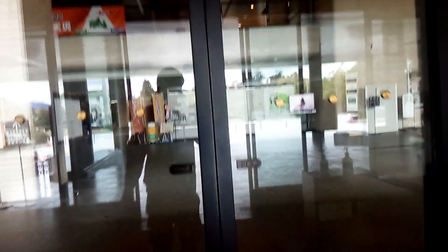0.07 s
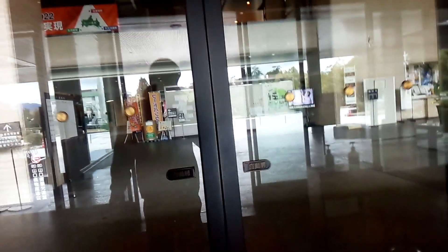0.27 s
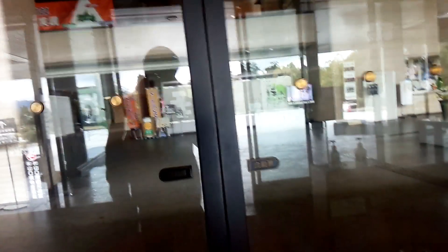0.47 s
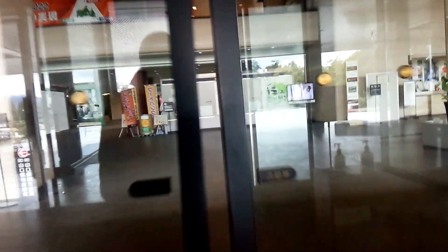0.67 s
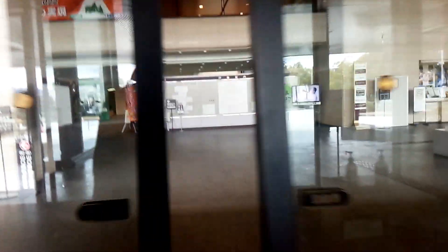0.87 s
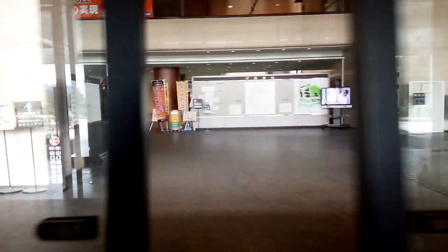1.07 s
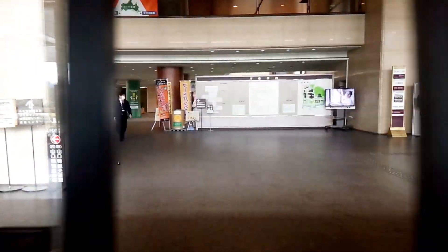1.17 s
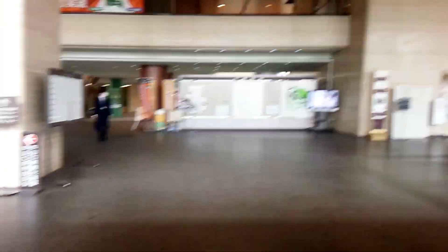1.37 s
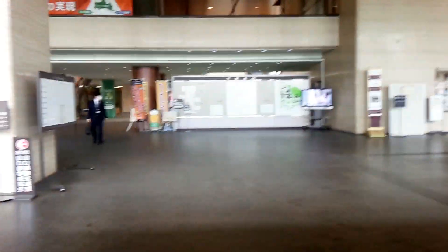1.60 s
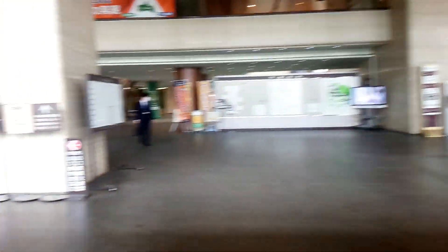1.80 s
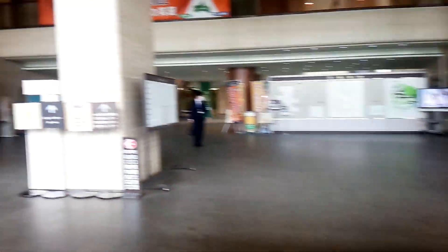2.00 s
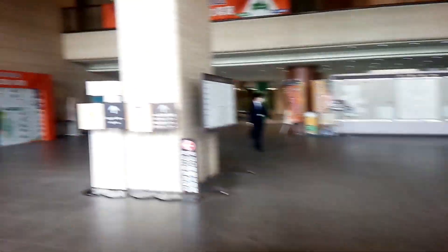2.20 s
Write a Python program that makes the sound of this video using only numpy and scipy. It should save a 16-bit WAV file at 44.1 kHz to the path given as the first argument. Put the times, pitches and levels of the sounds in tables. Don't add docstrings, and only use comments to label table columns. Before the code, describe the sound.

Automatic sliding glass doors start with a brief motor hum and rubbery scrape, then rumble along the rail with light knocks and two hard clicks, heard close up in a hard, echoing entrance porch.

```python
import sys
import numpy as np
from scipy import signal
from scipy.fft import rfft, irfft
from scipy.io import wavfile

SR = 44100
rng = np.random.default_rng(int(sys.argv[2]) if len(sys.argv) > 2 else 0)


def wav_out(sig):
    wavfile.write(sys.argv[1], SR, np.round(np.clip(np.atleast_2d(sig).T, -1, 1) * 32767).astype(np.int16))


def level_to_linear(level):
    exponent = np.asarray(level, float) / 20
    return 10 ** exponent


N = 99225

# (frequency [Hz], density [dB per Hz])
AIR_SPECTRUM = [(150, -15), (250, -18), (600, -16.5), (1200, -28), (2000, -32), (3200, -33.5), (6000, -41),
                (16000, -37.5)]
# (time [s], rotation [Hz], level [dB])
MOTOR_RUN = [
    (.2, 45.87, -76),
    (.25, 44.05, -38.5),
    (.38, 41.73, -40),
    (.46, 42.3, -36),
    (.52, 41.6, -70),
]

# (time [s], level [dB])
SEAL_DRAG = [(.464, -77), (.471, -54), (.49, -44.5), (.56, -47), (.61, -44), (.66, -56), (.75, -62),
             (.9, -64), (1.1, -79)]
BRUSH_DRAG = [(.464, -76), (.48, -54), (.5, -52.5), (.53, -49.5), (.575, -52.5), (.61, -48), (.635, -55.5),
              (.75, -56), (1.0, -70)]
FRAME_HUM = [(0.0, -39), (0.06, -60), (0.38, -35.5), (0.48, -40.5), (0.53, -44), (0.57, -38.5),
             (0.72, -30.5), (.87, -32.5), (.93, -38), (1.05, -37), (1.24, -43.5), (1.38, -37), (1.86, -50),
             (1.88, -42.5), (2.25, -55.5)]
PANE_SHAKE = [(0.0, -38), (0.16, -46.5), (0.21, -39.5), (0.54, -38), (0.64, -30.5), (0.76, -31),
              (0.83, -32), (0.89, -31.5), (0.92, -38), (1.0, -35), (1.25, -45.5), (1.3, -33.5), (1.45, -39),
              (1.56, -40.5), (1.76, -46.5), (1.83, -39.5), (2.04, -53), (2.25, -49)]
BOX_ROLL = [(0.0, -50), (0.03, -58.5), (0.48, -48.5), (0.65, -34), (0.68, -29.5), (.9, -36.5), (.97, -40),
            (1.11, -42), (1.16, -36.5), (1.21, -62), (1.27, -33.5), (1.41, -38), (1.49, -35), (1.9, -40),
            (2.08, -50.5), (2.12, -39.5), (2.21, -47), (2.25, -60)]
RAIL_RUN = [(0.0, -52), (0.43, -61), (0.55, -43), (0.6, -41.5), (0.62, -38), (0.77, -34), (0.82, -41),
            (0.98, -46), (1.0, -41.5), (1.31, -33), (1.5, -37.5), (1.7, -36), (1.8, -38), (1.86, -35.5),
            (1.96, -42), (2.1, -46), (2.18, -51.5), (2.25, -41.5)]
WHEEL_SONG = [(0.0, -60), (0.45, -67), (0.58, -51.5), (0.63, -43), (0.77, -43.5), (0.84, -48.5),
              (0.97, -54.5), (1.1, -47.5), (1.22, -47.5), (1.28, -42), (1.5, -42.5), (1.7, -43),
              (1.82, -46), (1.95, -48), (2.05, -56), (2.25, -56.5)]

# (frequency [Hz], width [Hz], level [dB])
SEAL_MODES = [(2060, 440, -1), (2593, 220, 0), (2894, 150, 5.5), (3520, 450, -8), (4050, 440, -7.5)]
BRUSH_MODES = [(7340, 1500, -1.5), (9400, 1800, -3.5), (13000, 4000, -17)]
FRAME_MODES = [(67.7, 26, -11.5), (82.7, 7.4, -2.5), (119.5, 14.3, -5.5), (46.8, 32, -14.5),
               (98.7, 16.8, -4.5)]
PANE_MODES = [(120.4, 19, -7.5), (147.3, 17.2, -2), (187.6, 42, -10.5)]
BOX_MODES = [(230.2, 25, -1.5), (259.2, 15.7, 1), (285.9, 16.6, -0.5), (318, 25, -3.5)]
RAIL_MODES = [(368.4, 90, 5.5), (428, 61, 4.5), (504, 98, 2.5), (632, 108, -5.5), (770, 240, -5.5)]
WHEEL_MODES = [(949, 212, 1), (1128, 220, -3.5), (1390, 196, -8), (1670, 320, -16)]

# (time [s], frequency [Hz], level [dB], length [s])
ROUGH_SPOTS = [(.62, 151, -26.5, 0.039), (.655, 149, -22.5, 0.033), (.69, 135, -26, .02),
               (0.68, 266, -25.5, .02), (0.715, 262, -25, .015), (.735, 142, -20, 0.025),
               (0.747, 303, -27, 0.017), (0.761, 158, -23, 0.017), (.765, 292, -27.5, 0.01),
               (.793, 111, -20, 0.023), (.819, 252, -29, 0.02), (.846, 124, -23.5, 0.019),
               (.885, 144, -21.5, 0.017), (0.883, 285, -28.5, 0.014), (1.261, 333, -30, 0.012),
               (1.281, 334, -27.5, 0.019), (1.305, 162.7, -21.5, 0.031), (1.34, 302, -28.5, 0.015),
               (1.372, 158, -24, 0.029), (1.396, 125, -22.5, 0.014), (1.49, 147, -24.5, 0.016),
               (1.548, 150, -25, 0.019), (1.598, 150, -30.5, 0.037), (1.69, 260, -29, 0.033),
               (1.82, 232, -32.5, 0.027), (1.9, 510, -31, .015), (1.93, 260, -29.5, .018),
               (1.957, 78, -34, .018), (1.997, 470, -35, 0.023), (2.027, 449, -37, 0.017),
               (2.243, 262, -35, .012)]
# (time [s], frequency [Hz], level [dB], 60 dB decay [s])
FITTING_RINGS = [(0.00606, 1020, -35, 0.043), (0.209, 190, -28.5, 0.105), (.482, 891, -32.5, 0.14),
                 (0.481, 790, -43, 0.11), (.619, 630, -25.5, 0.076), (0.618, 950, -30, 0.13),
                 (2.23, 530, -34.5, 0.18), (0.00503, 1380, -33.5, 0.026), (1.559, 1090, -22.5, .03),
                 (1.56, 770, -34, 0.11), (1.561, 5200, -35.5, 0.064), (1.562, 4300, -38, 0.083),
                 (1.562, 2019, -32, 0.038), (1.562, 1658, -35.5, 0.22), (1.0, 921, -33.5, 0.076),
                 (1.0, 1750, -33, 0.085)]

# (time [s], edge [dB], clack [dB], knock [dB], thud [dB])
SMALL_CONTACTS = [(.468, -66, -42.5, -35.5, -55), (.482, -47, -31, -55, -63), (.5147, -43.5, -50, -70, -70),
                  (.52, -65, -35.5, -60, -37.5), (.585, -40, -58, -61, -51), (.618, -60, -55, -24.5, -29),
                  (.642, -24.5, -33, -38, -50), (.860, -41.5, -75, -65, -62), (.970, -39, -49, -36.5, -58),
                  (1.255, -80, -47.5, -36.5, -33.5), (1.275, -82, -49.5, -44, -29),
                  (1.413, -54.5, -45, -45, -62), (1.437, -70, -48.5, -62, -72), (2.175, -75, -57, -53, -75),
                  (2.232, -70, -70, -61, -41)]
# (time [s], edge [dB], clack [dB], knock [dB], thud [dB])
HARD_CLICKS = [
    (.005, -56, -50.5, -38, -61),
    (.9982, -19, -31, -28, -36),
    (1.011, -29, -29, -31.5, -56),
    (1.5588, -34, -42, -28.5, -38),
    (1.5597, -22.5, -32.5, -27.5, -31),
    (1.568, -33, -35.5, -37, -56),
]

# (frequency [Hz], width [Hz], level [dB])
EDGE_MODES = [(7330, 2100, -4), (8740, 980, 3), (9640, 1200, 4.5), (13000, 3700, -16)]
CLACK_MODES = [(2083, 730, 4.5), (2760, 900, 0), (3800, 1080, -3)]
KNOCK_MODES = [(630, 270, -13), (780, 193, 1), (922, 82, -2), (1220, 480, -3)]
THUD_MODES = [(188.3, 65, 1), (275, 89, -4), (549, 142, -7.5)]
HARD_EDGE_MODES = [(7300, 2200, -3), (8870, 1000, 2), (9800, 1850, 1.5), (12500, 1500, -14),
                   (14600, 3700, -14)]
HARD_CLACK_MODES = [(2200, 1000, 5), (3280, 500, -1.5), (3820, 830, 4.5), (5250, 600, -5)]
HARD_KNOCK_MODES = [(960, 620, -2.5), (1363, 410, 1.5), (1640, 320, 2)]

# (edge [s], clack [s], knock [s], thud [s])
RISE_S = [.0003, .002, .002, .003]
CHATTER_S = [.003, .006, .007, .008]
LAG_S = [0, .0005, 0, 0]
HARD_CHATTER_S = [0.0027, 0.0091, 0.0069, 0.0065]
HARD_LAG_S = [0, .0008, .0003, 0]
# (edge, clack, knock, thud), [dB] or 60 dB decay [s]
NEAR_DB = [-20, -25, -27, 0]
NEAR_T60_S = [0.093, 0.082, 0.17, 0.12]
PORCH_DB = [-14, -11.5, -7.5, -9.5]
PORCH_T60_S = [0.7, 0.69, 0.73, 1.4]
HARD_NEAR_DB = [-7, -22, -9, -18]
HARD_PORCH_DB = [-20.5, -13, -12, -9]


def rms_one(x):
    return x / np.sqrt(np.mean(x ** 2) + 1e-20)


def level(rows):
    time_s, db = np.transpose(rows)
    return level_to_linear(np.interp(np.arange(N) / SR, time_s, db))


def drift(rate_hz):
    step = 40
    r = np.exp(-2 * np.pi * rate_hz * step / SR)
    noise = rng.standard_normal(N // step + 2002)
    slow = signal.lfilter([1], [1, -2 * r, r * r], noise)[2000:]
    return np.interp(np.arange(N) / step, np.arange(len(slow)), rms_one(slow))


def body(x, modes, passes=2):
    out = 0
    for k, (hz, width_hz, db) in enumerate(modes):
        r = np.exp(-np.pi * width_hz / SR)
        feed = [(1 - r * r) / 2, 0, (r * r - 1) / 2]
        back = [1, -2 * r * np.cos(2 * np.pi * hz / SR), r * r]
        y = x + 1e-18
        for _ in range(passes):
            y = signal.lfilter(feed, back, y)
        out = out + (-1) ** k * level_to_linear(db) * y
    return out


def shaken(modes, rows, bumps_db, bump_rate_hz):
    push = rng.standard_normal(N + SR // 4)
    ringing = rms_one(body(push, modes)[-N:])
    return level(rows) * level_to_linear(bumps_db * drift(bump_rate_hz)) * ringing


def hits(table, parts, chatter_s, lag_s, near_db, porch_db):
    fill_s = .008
    t = np.arange(SR) / SR
    rows = np.array(table)
    out = np.zeros(N)
    for k, modes in enumerate(parts):
        starts = np.zeros(N)
        index = ((rows[:, 0] + abs(lag_s[k])) * SR).astype(int)
        starts[index] = level_to_linear(rows[:, k + 1])
        near = level_to_linear(2 * (near_db[k] - 60 * t / NEAR_T60_S[k]))
        porch = level_to_linear(2 * (porch_db[k] - 60 * t / PORCH_T60_S[k]))
        direct = (1 - np.exp(-t / RISE_S[k])) ** 2 * np.exp(-2 * t / chatter_s[k])
        power = direct + (1 - np.exp(-t / fill_s)) * (near + porch)
        shape = np.sqrt(np.maximum(signal.fftconvolve(starts ** 2, power)[:N], 0))
        noise = rng.standard_normal(N)
        out += body(shape * noise, modes) / np.std(body(noise, modes))
    return out


def air():
    air_db, port_db, fade_db_per_s = -53, -67, 0.7
    hz, db = np.array(AIR_SPECTRUM).T
    f = np.fft.rfftfreq(N, 1 / SR) + 1
    colour = level_to_linear(np.interp(np.log(f), np.log(hz), db))
    wash = irfft(rfft(rng.standard_normal(N)) * colour, N)
    port = body(rng.standard_normal(N), [(8500, 6900, 0)])
    steady = level_to_linear(air_db) * rms_one(wash) + level_to_linear(port_db) * rms_one(port)
    return level_to_linear(-fade_db_per_s * np.arange(N) / SR) * steady


def earlier_echo():
    echo_db, t60_s = -57, 1.7
    modes = [(1550, 1900, -1.0), (2940, 2200, -9), (9140, 3100, -5.5)]  # (Hz, width Hz, dB)
    echo = rms_one(body(rng.standard_normal(N), modes))
    return level_to_linear(echo_db - 60 * np.arange(N) / SR / t60_s) * echo


def motor():
    time_s, hz, db = np.transpose(MOTOR_RUN)
    turn = 2 * np.pi * np.cumsum(np.interp(np.arange(N) / SR, time_s, hz)) / SR
    tones = np.sin(2 * turn) + level_to_linear(1.0) * np.sin(3 * turn)
    return level(np.c_[time_s, db]) * tones


def seals():
    grains = rng.standard_normal(N) * level_to_linear(2.65 * rng.exponential(1, N))
    grains = grains * level_to_linear(0.83 * drift(29.2))
    rubber = level(SEAL_DRAG) * rms_one(body(grains, SEAL_MODES))
    brush = level(BRUSH_DRAG) * rms_one(body(grains, BRUSH_MODES))
    return rubber + brush


def frame_and_panes():
    frame = shaken(FRAME_MODES, FRAME_HUM, 2.3, 25)
    panes = shaken(PANE_MODES, PANE_SHAKE, 0.9, 22)
    return frame + panes


def rollers():
    box = shaken(BOX_MODES, BOX_ROLL, 1.4, 31)
    rail = shaken(RAIL_MODES, RAIL_RUN, 0.58, 60)
    wheels = shaken(WHEEL_MODES, WHEEL_SONG, 0.54, 61)
    return box + rail + wheels


def jolts():
    time_s, hz, db, length_s = np.array(ROUGH_SPOTS).T[:, :, None]
    t = np.arange(N) / SR - time_s
    swell = level_to_linear(db) * np.exp(-2 * (t / length_s) ** 2)
    return (swell * np.cos(2 * np.pi * hz * t)).sum(axis=0)


def fittings():
    rise_s = 0.0011
    time_s, hz, db, t60_s = np.array(FITTING_RINGS).T[:, :, None]
    t = np.maximum(np.arange(N) / SR - time_s, 0)
    decay = level_to_linear(db - 60 * t / t60_s) * (1 - np.exp(-t / rise_s))
    return (decay * np.sin(2 * np.pi * hz * t)).sum(axis=0)


def small_contacts():
    parts = [EDGE_MODES, CLACK_MODES, KNOCK_MODES, THUD_MODES]
    return hits(SMALL_CONTACTS, parts, CHATTER_S, LAG_S, NEAR_DB, PORCH_DB)


def hard_clicks():
    parts = [HARD_EDGE_MODES, HARD_CLACK_MODES, HARD_KNOCK_MODES, THUD_MODES]
    return hits(HARD_CLICKS, parts, HARD_CHATTER_S, HARD_LAG_S, HARD_NEAR_DB, HARD_PORCH_DB)


def scene():
    background = air() + earlier_echo() + motor()
    sliding = seals() + frame_and_panes() + rollers() + jolts()
    struck = fittings() + small_contacts() + hard_clicks()
    return (background + sliding + struck)[None]


def band_limit(x):
    return signal.sosfilt(signal.butter(12, 16460, fs=SR, output="sos"), x)


def record(dry):
    top_hz, bass_hz, offset = 16400, 30, -.001
    top_cut = signal.cheby2(12, 60, top_hz, fs=SR, output="sos")
    bass_cut = signal.butter(2, bass_hz, "high", fs=SR, output="sos")
    mix = signal.sosfilt(bass_cut, signal.sosfilt(top_cut, dry)) + offset
    return band_limit(mix)


dry = scene()
out = record(dry)
wav_out(out)
```